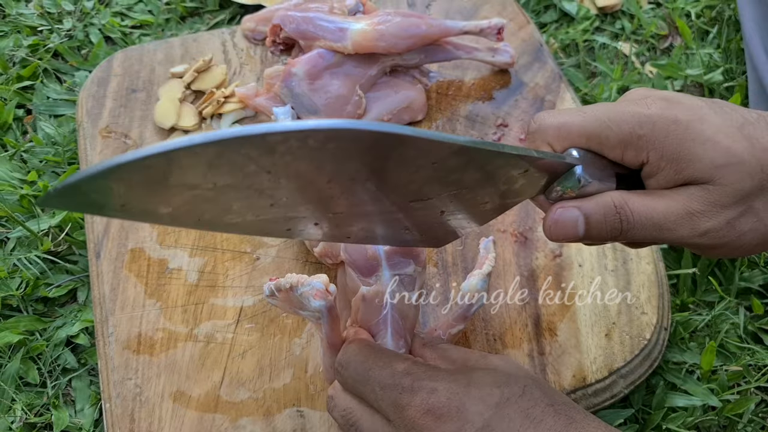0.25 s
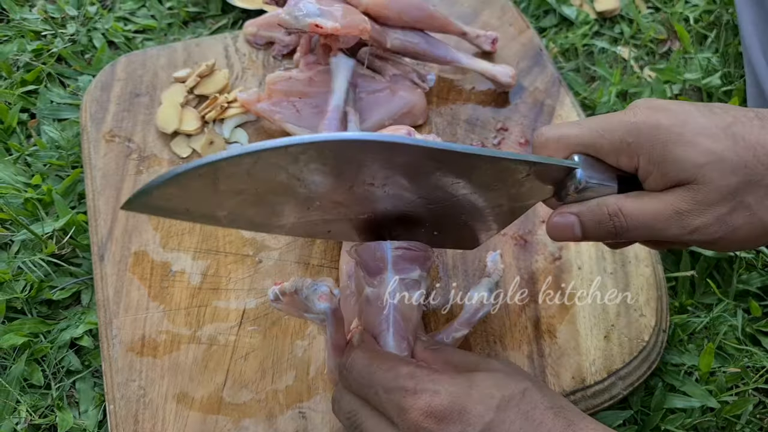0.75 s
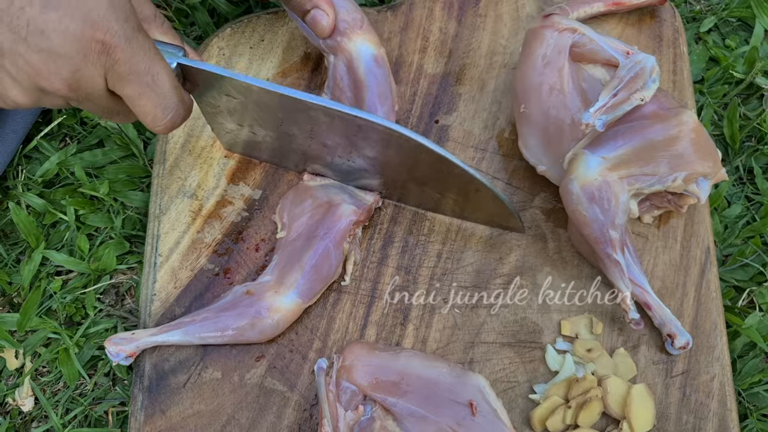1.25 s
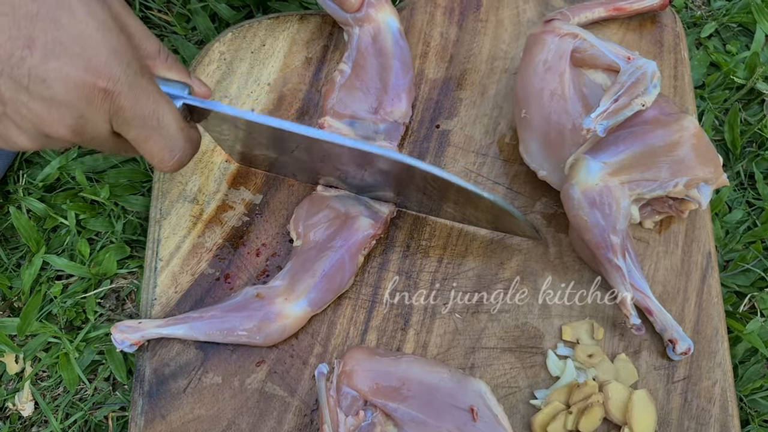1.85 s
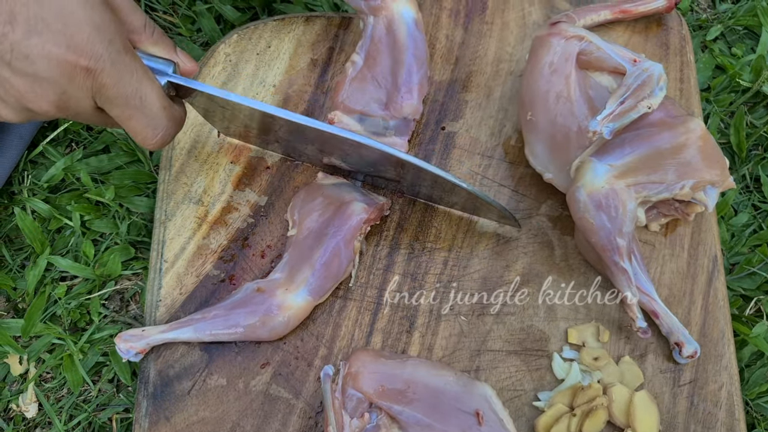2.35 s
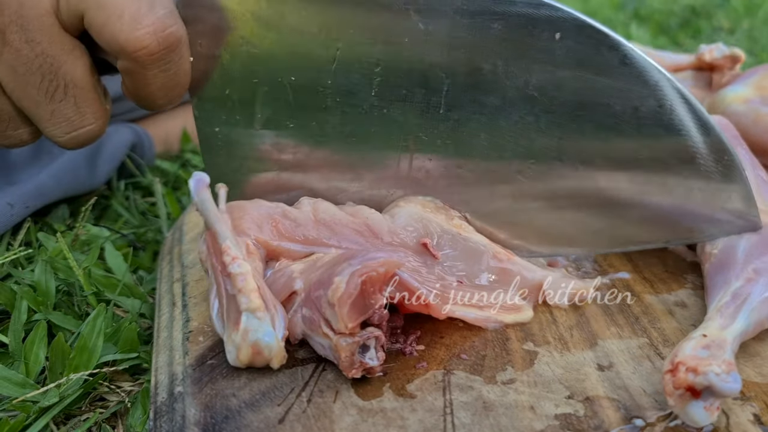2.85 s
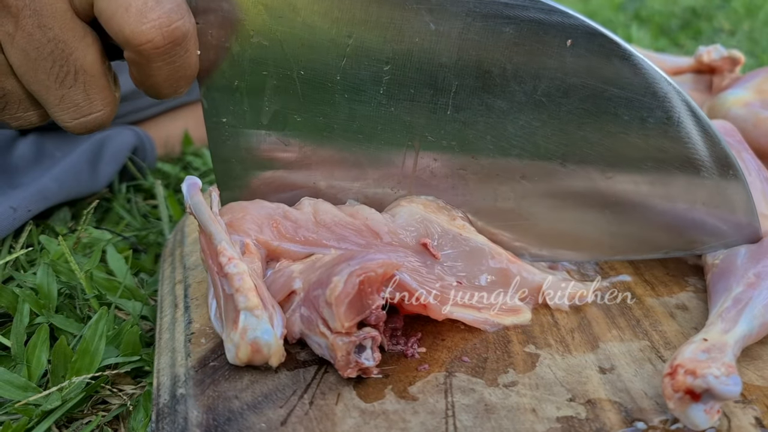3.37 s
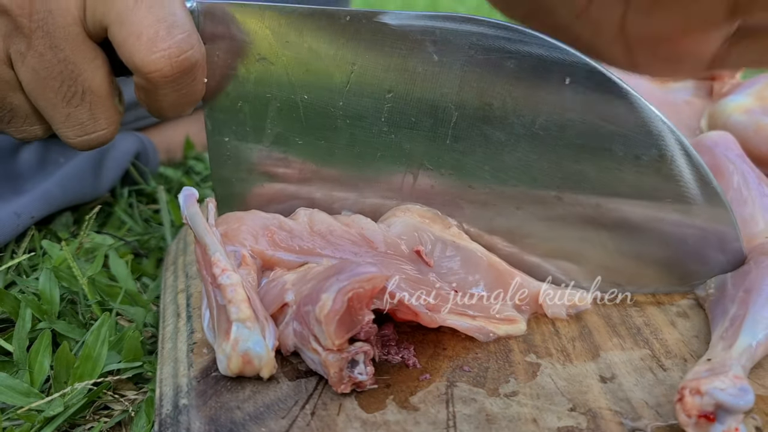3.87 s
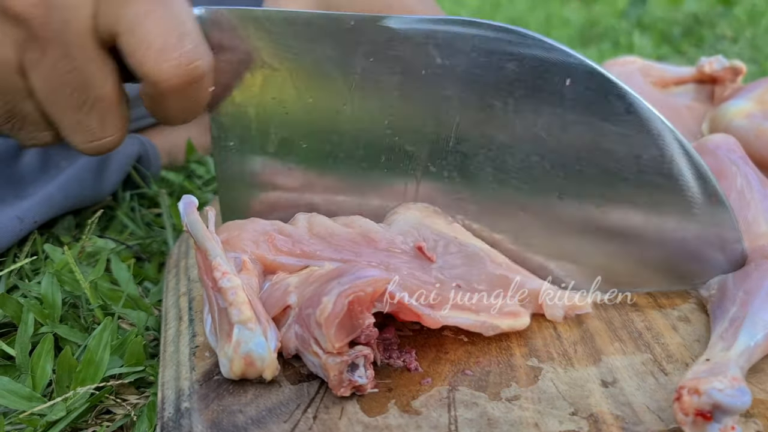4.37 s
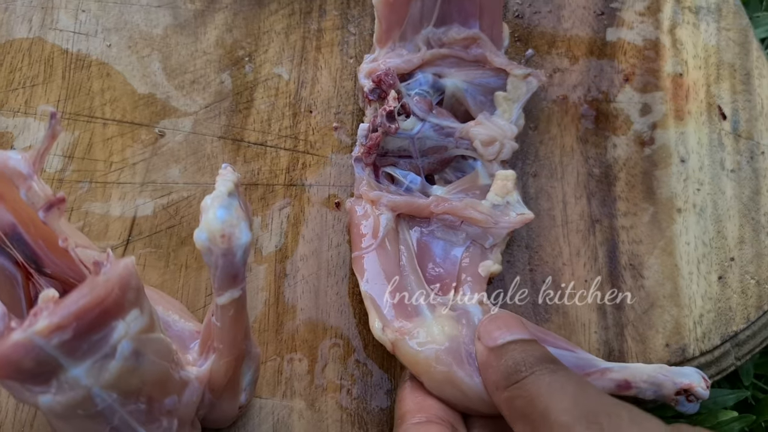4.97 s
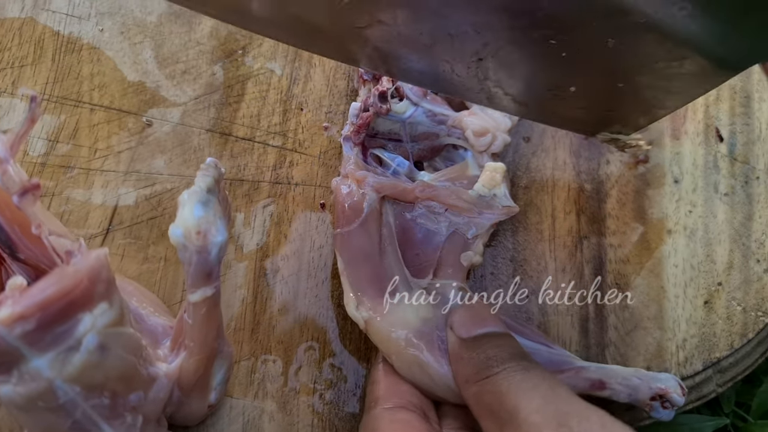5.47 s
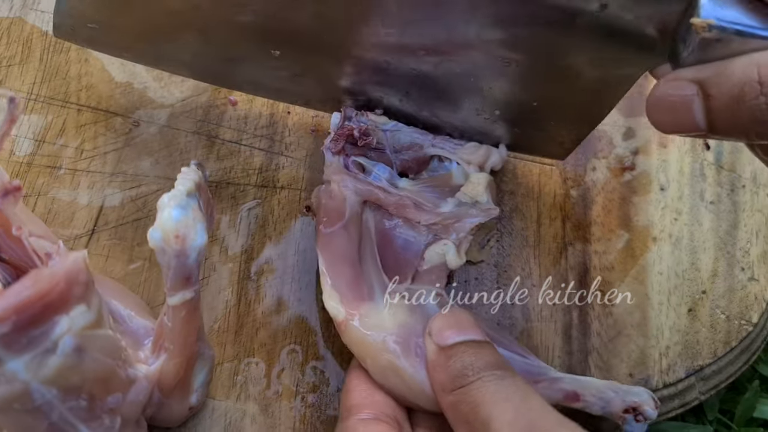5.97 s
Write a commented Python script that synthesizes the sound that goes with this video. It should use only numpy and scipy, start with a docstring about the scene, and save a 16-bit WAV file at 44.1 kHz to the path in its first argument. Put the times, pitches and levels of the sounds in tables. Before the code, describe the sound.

A heavy cleaver chops raw meat and bone on a thick wooden board outdoors, with hard woody thuds, gristly crunches and gusty low wind.

```python
"""On a thick wooden board lying on grass, a heavy cleaver chops raw chicken, heard close by.
Chops are fading sine tones (board, knock, thud) and filtered noise (flesh); crunches are bursts of clicks
that also ring the blade. Light taps, soft dull pats and bumps, and tearing gristle fill the gaps.
Wind is uneven low noise with single dull bumps. Behind it lie a faint hiss, a short steady hiss at the
start, a thin band of insects, and far birds made of gliding tones."""
import sys
import numpy as np
from scipy import signal
from scipy.fft import rfft, irfft, next_fast_len
from scipy.io import wavfile
from scipy.ndimage import uniform_filter1d, minimum_filter1d

SR = 44100
rng = np.random.default_rng(int(sys.argv[2]) if len(sys.argv) > 2 else 0)


def output_pcm(signal):
    """Save a mono or channel-first signal as 16-bit PCM at the path in sys.argv[1].

    Samples are clipped to [-1, 1] before scaling.
    """
    pcm = np.clip(np.atleast_2d(signal).T, -1, 1) * 32767
    wavfile.write(sys.argv[1], SR, np.round(pcm).astype(np.int16))


N = 273993
TIME = np.arange(N) / SR
CUTOFF_HZ = 15800  # coloured noise stops here

# Chops, one of them a light slice: t/s, thud level/dB, thud f/Hz, thud sag/share of pitch, board ring level/dB,
# board pitch/ratio, ring length/ratio, off-centre boost of the low modes/dB, knock f/Hz, knock level/dB,
# contact sharpness f/Hz, flesh level/dB, flesh f/Hz, cut time from skin to board/s, bite level/dB,
# ground thump level/dB, bone crack level/dB, wet squelch level/dB, splinter delay/s,
# splinter level/dB relative to crack and squelch
CHOPS = [(0.824, -20.5, 290, 0.02, -35.5, 1.22, 0.61, 11, 913, -16.5, 3000, -36.5, 930, .005, -25, -15.5, -34.5, -49, .012, 2),
         (2.354, -9, 440.4, 0.07, -12, 1.057, 0.65, 3, 765, -2.5, 1315, -8.5, 645, 0.0053, -16.5, -48.5, -24.5, -46.5, .004, -4.5),
         (2.834, -5.5, 230, 0.018, -7.5, 1.008, 1.06, 0.5, 1170, -3, 1610, -18.5, 887, .011, -18.5, -8.5, -21.5, -15, .0175, -12.5),
         (3.7311, -10, 440, 0.094, -10, 1.02, 0.51, -11, 1132, -6.5, 3000, -8, 736, 0.0041, -31, -6.5, -21.5, -20, 0.014, -9.5),
         (4.6242, -35.5, 463, 0.067, -37.5, 1.2, 0.64, -4, 1120, -18, 4000, -42, 1480, .004, -41, -61, -27.5, -29.5, 0.0095, -4.5),
         (5.9684, 6.5, 425, 0.03, -9.5, .985, 0.79, 5, 797, -10.5, 800, -10, 552, 0.0065, -17, -12.5, -34, -46.5, 0.0024, -12.5)]
# Ringing of the board with the blade in it, before each chop scales it: f/Hz, level/dB, t60/s
BOARD_MODES = [(262, -14.5, 0.1), (325, -7, 0.135), (376.2, 4.5, 0.16), (610, -12.5, 0.056),
               (686, -9, 0.096), (766, -9, 0.11), (1040, -20.5, 0.15), (1325, -15, 0.045),
               (1900, -25, 0.032)]
# Stages of each cut: lead on meeting the board/share of the cut time,
# crack level/dB and squelch level/dB relative to the chop's own, decay/s
CUT_STAGES = [(0.92, -10, -14.5, 0.0022), (0.48, -2.5, 0.5, 0.0035), (-0.27, 0, -15.5, 0.0028)]
# Ringing of the steel blade, damped by the meat, relative levels: f/Hz, level/dB
BLADE_MODES = [(1120, 0.5), (1340, -2), (1965, 3.5), (2900, -4.5), (3310, -4), (3720, -3.5), (4516, -9),
               (6753, -6), (7350, 1.5), (8311, 3.5), (8950, 2.5), (10411, 1.5)]
# The blade is set down lightly or rocks on the board: t/s, thud level/dB
LIGHT_TAPS = [(0.887, -43), (1.484, -40), (1.504, -34), (1.524, -38), (1.614, -40.5), (2.302, -35.5),
              (2.403, -27), (2.572, -39), (6.038, -33.5)]
# Gristle snaps under the pressed blade: t/s, bone crack level/dB, wet squelch level/dB
GRISTLE_SNAPS = [(0.831, -31.5, -49), (0.845, -42.5, -54), (1.5365, -38, -63.5), (2.343, -41.5, -64.5),
                 (2.9092, -45.5, -45.5), (2.9868, -53, -63.5), (4.2776, -42, -42.5), (4.4188, -64, -44),
                 (4.629, -33.5, -34), (4.643, -32, -50.5), (4.7022, -44.5, -37), (4.8775, -30.5, -27.5),
                 (4.9621, -41.5, -40), (5.0268, -45, -40)]
# Small fibres tear as the blade is worked through: start t/s, end t/s, mid crack level/dB, mid squelch level/dB
FIBRE_TEARS = [(2.595, 2.814, -64, -62.5), (4.218, 4.478, -64, -63.5), (4.633, 5.059, -61.5, -57.5),
               (4.997, 5.041, -56, -58.5)]
# Soft dull pats and bumps: t/s, level/dB, f/Hz
SOFT_PATS = [(1.345, -44, 380), (1.387, -39.5, 323), (2.908, -35, 320), (2.985, -45.5, 450),
             (5.21, -32, 448), (5.619, -49, 950)]
# Colour of cracking bone: f/Hz, relative level/dB per Hz
BONE_COLOUR = [(300, -13.5), (700, -11.5), (1200, 8.5), (1600, -7.5), (2000, 4), (2900, -0.5), (4000, -12),
               (6000, -28.5), (12000, -49.5)]
# Colour of squelching meat: f/Hz, relative level/dB per Hz
MEAT_COLOUR = [(1500, -27.5), (3000, -3), (4500, 0), (7300, -4.5), (9500, 0.5), (11500, 1.5), (13000, -3.5),
               (15500, -15)]
# Colour of the scatter from the surroundings: f/Hz, relative level/dB per Hz
SCATTER_COLOUR = [(100, -15), (350, 10.5), (800, -4.5), (3000, 8), (8000, -9.5)]
# Listening positions: start t/s, board left-right level/dB (positive is left), left wind level/dB,
# right wind level/dB, open hiss level/dB, right hiss level/dB, insect level/dB
POSITIONS = [(0.181, -31.5, -32.5, -27.5, -69, -91, -110), (1.341, 2.95, -61.5, -57.5, -51.5, -86.5, -105),
             (2.481, -36, -34, -50.5, -74.5, -52, -68), (4.971, -25.5, -26.5, -25.5, -70, -83.5, -105)]
# Strong gusts: t/s, width/s, boost over the wind/dB
STRONG_GUSTS = [(0.369, 0.036, 4), (1.209, 0.036, 9.5), (1.35, 0.037, 6.5), (3.945, 0.018, 15.5),
                (5.229, 0.031, 15.5)]
# Strong wind bumps on the microphone ports: t/s, level/dB, f/Hz, left-right level/dB, edge sharpness f/Hz
STRONG_BUMPS = [(1.193, -10, 93, -43, 800), (1.315, -13.5, 81.6, -22.5, 396), (1.441, -12.5, 106, -34, 700),
                (1.46, -12.5, 76, -25, 260), (3.094, -6.5, 98, 35, 350), (5.126, -12, 169, 21.5, 3000),
                (5.146, -15, 164.6, 17.5, 2500), (5.197, -5, 120, 17, 800), (5.22, -2, 90, -27, 420),
                (5.385, -10, 112, -18, 400)]
# Colour of the wind rumble: f/Hz, relative level/dB per Hz
RUMBLE_COLOUR = [(20, -7), (35, 3.5), (72, 5), (90, -4.5), (170, -30.5), (300, -40.5), (1200, -71),
                 (4000, -86.5)]
# Colour of the open outdoor hiss: f/Hz, relative level/dB per Hz
OPEN_HISS_COLOUR = [(30, 12), (70, 18), (150, 7), (250, 0), (380, 2.5), (600, -8), (2500, -13.5),
                    (3800, -18), (5000, -24), (7000, -42), (9000, -27.5), (15000, -30.5)]
# Colour of the hiss towards the right: f/Hz, relative level/dB per Hz
RIGHT_HISS_COLOUR = [(60, -2.5), (150, 8.5), (280, -3.5), (410, 8.5), (600, -11), (1100, -16), (1600, -23),
                     (2100, -18.5), (2500, -24), (6000, -26), (7000, -42.5), (8000, -29), (10500, -36),
                     (12500, -39.5)]
# Colour of the short steady hiss at the start: f/Hz, relative level/dB per Hz
OPENING_HISS_COLOUR = [(60, 22), (200, 9.5), (4000, -6), (15000, -15)]
# Far bird calls before flutter and scatter: t/s, length/s, mid pitch f/Hz, glide/Hz,
# arch/share by which the ends lie below the middle, level/dB
BIRD_CALLS = [(2.154, 0.15, 3140, -39, 0.009, -62.5), (2.529, 0.3, 1640, -22.5, 0.014, -58.5),
              (2.613, 0.16, 1330, -350, .01, -62), (3.848, 0.45, 1690, 135, .11, -65),
              (3.957, 0.26, 3060, 67.5, -0.049, -76.5), (4.062, 0.21, 1320, -460, -.02, -64.5),
              (4.46, 0.1, 2760, -200, .02, -65), (4.582, 0.25, 3100, 97.5, 0.019, -62),
              (5.023, 0.12, 2725, 199, 0.053, -66), (5.403, 0.069, 2880, -130, -.01, -75.5),
              (6.111, 0.063, 2830, -88, -.01, -79)]

CROSSFADE_S = 0.18  # hiss, insects and wind fade between positions
PUSH_S, THUD_SETTLE_S = 0.0008, 0.029  # the board takes up the blow; the thud sags as the edge beds in
FLESH_SPREAD = 1.5  # band edges of the flesh sound, as a ratio to its middle
# The edge meets bone and shoves it against the board, this share of the cut time early
BITE_LEAD_SHARE, BITE_RISE_S, BITE_DECAY_S = 0.41, 0.0012, 0.011
TAP_HZ, TAP_SAG, TAP_KNOCK_HZ, TAP_CONTACT_HZ, TAP_FLESH_HZ = 413.3, 0.12, 800, 940, 570
TAP_RING_DB, TAP_KNOCK_DB, TAP_FLESH_DB = -3.5, -11, -19  # relative to the thud
TAP_RING_SHARE = 0.79  # the resting blade shortens the board's ring
SPLINTER_DECAY_S, SNAP_DECAY_S, TEAR_DECAY_S = 0.0023, 0.0014, 0.003
THUMP_HZ, THUMP_T60_S, THUMP_EDGE_HZ = 129, 0.018, 240
BUFFET_DB, BUFFET_HZ, BUFFET_EDGE_HZ = 9.5, 93.4, 270  # weak wind bumps; level relative to the wind
OPENING_HISS_END_S, OPENING_HISS_FADE_S, OPENING_HISS_DB = 0.15, 0.012, -50
STILL_AIR_DB = -83.5  # hiss that is always there
TWITTER_START_S, TWITTER_END_S, TWITTER_PER_S = 3.2, 4.5, 9
TWITTER_HZ, TWITTER_GLIDE_HZ, TWITTER_DB, TWITTER_SPREAD = 2130, -240, -68, 0.03


def board_blows(thud_t60=0.042, knock_t60=0.023, flesh_t60=0.065):
    """The blade stops in the wood: a damped thud, a knock of steel, a smack of flesh and the board's ring."""
    out = np.zeros((2, N))
    t = np.arange(SR // 3) / SR
    push = 1 - np.exp(-t / PUSH_S)
    main_hz = max(BOARD_MODES, key=lambda mode: mode[1])[0]
    bedded_s = t - THUD_SETTLE_S * (1 - np.exp(-t / THUD_SETTLE_S))
    for (s, thud_db, thud_hz, sag, ring_db, tuning, length, off_centre_db,
         knock_hz, knock_db, contact_hz, flesh_db, flesh_hz) in chops_and_taps():
        modes = np.zeros(len(t))
        for hz, db, t60 in BOARD_MODES:
            # a blow off the centre changes the modes below the main one; each also varies by chance
            mode_db = db + off_centre_db * (hz < main_hz) + rng.standard_normal()
            modes += from_db(mode_db) * ring(t, tuning * hz, length * t60)
        flesh = soft_modes(flesh_hz, FLESH_SPREAD, len(t)) * np.exp(-np.log(1000) * t / flesh_t60)
        body = (from_db(ring_db) * modes + from_db(flesh_db) * flesh) * push
        thud = from_db(thud_db) * ring(t - sag * bedded_s, thud_hz, thud_t60)
        knock = from_db(knock_db) * ring(t, knock_hz, knock_t60)
        blow = low_pass(body + thud + knock, contact_hz, order=3)
        add(out, s, -board_sides(s) * blow)  # minus: the wave starts downwards
    return out


def chops_and_taps():
    """Chops and light taps strike the board alike: rows of CHOPS columns up to flesh f/Hz."""
    taps = [(s, db, TAP_HZ, TAP_SAG, db + TAP_RING_DB, 1, TAP_RING_SHARE, 0,
             TAP_KNOCK_HZ, db + TAP_KNOCK_DB, TAP_CONTACT_HZ, db + TAP_FLESH_DB, TAP_FLESH_HZ)
            for s, db in LIGHT_TAPS]
    return [row[:13] for row in CHOPS] + taps


def bites():
    """Just before the blade meets the board, it shoves bone against the wood: a swell of soft, damped modes."""
    out = np.zeros((2, N))
    t = np.arange(-SR // 30, SR // 20) / SR
    for row in CHOPS:
        s, (flesh_hz, cut_s, bite_db) = row[0], row[12:15]
        bite = soft_modes(flesh_hz, FLESH_SPREAD, len(t)) * swell(t, BITE_RISE_S, BITE_DECAY_S)
        add(out, s - BITE_LEAD_SHARE * cut_s + t[0], board_sides(s) * from_db(bite_db) * bite)
    return out


def crunches(rise_s=0.00078, grain_db=6.0, linger_db=-24, creep_s=0.005, linger_s=0.0052):
    """Fibres snap in a dense run of uneven clicks that flares as the edge bites and dies as it passes."""
    bone, meat = np.zeros((2, N)), np.zeros((2, N))
    t = np.arange(-SR // 50, SR // 12) / SR
    for s, crack_db, squelch_db, decay_s in breaks():
        # a few fibres give way before and after the main break
        run = swell(t, rise_s, decay_s) + from_db(linger_db) * swell(t, creep_s, linger_s)
        click_db = grain_db * np.minimum(rng.exponential(1, (2, len(t))), 4)
        clicks = rng.standard_normal((2, len(t))) * from_db(click_db)
        add(bone, s + t[0], board_sides(s) * from_db(crack_db) * run * rms_one(clicks[0]))
        add(meat, s + t[0], board_sides(s) * from_db(squelch_db) * run * rms_one(clicks[1]))
    crunch = coloured(bone, BONE_COLOUR) + coloured(meat, MEAT_COLOUR)
    return crunch + blade_ring(crunch)


def breaks(tears_per_stretch=30, spread_db=5.0):
    """Skin, meat, bone and gristle give way: rows of t/s, crack level/dB, squelch level/dB, decay/s."""
    rows = [(*snap, SNAP_DECAY_S) for snap in GRISTLE_SNAPS]
    for row in CHOPS:
        s, cut_s = row[0], row[13]
        crack_db, squelch_db, splinter_s, splinter_db = row[16:]
        for lead, stage_crack_db, stage_squelch_db, decay_s in CUT_STAGES:
            rows.append((s - lead * cut_s, crack_db + stage_crack_db, squelch_db + stage_squelch_db, decay_s))
        rows.append((s + splinter_s, crack_db + splinter_db, squelch_db + splinter_db, SPLINTER_DECAY_S))
    for start_s, end_s, crack_db, squelch_db in FIBRE_TEARS:
        for when, strength in rng.random((tears_per_stretch, 2)):
            s = start_s + when * (end_s - start_s)
            change_db = spread_db * (2 * strength - 1)
            rows.append((s, crack_db + change_db, squelch_db + change_db, TEAR_DECAY_S))
    return rows


def blade_ring(x, t60=0.022, ring_db=-6):
    """Whatever snaps at the edge makes the steel ring briefly."""
    t = np.arange(SR // 10) / SR
    modes = sum(from_db(db) * ring(t, hz, t60) for hz, db in BLADE_MODES)
    response = modes[None] / np.linalg.norm(modes)
    return from_db(ring_db) * signal.fftconvolve(x, response, axes=1)[:, :N]


def pats(rise_s=0.0011, decay_s=0.0067, spread=1.28):
    """Soft dull pats and bumps: a narrow band of noise that swells and dies quickly."""
    out = np.zeros((2, N))
    t = np.arange(-SR // 50, SR // 20) / SR
    for s, db, hz in SOFT_PATS:
        pat = soft_modes(hz, spread, len(t)) * swell(t, rise_s, decay_s)
        add(out, s + t[0], board_sides(s) * from_db(db) * pat)
    return out


def thumps():
    """From its first touch, a chop presses the whole board into the turf with a short, low thump."""
    out = np.zeros((2, N))
    t = np.arange(SR // 6) / SR
    thump = low_pass(ring(t, THUMP_HZ, THUMP_T60_S), THUMP_EDGE_HZ)
    for row in CHOPS:
        s, cut_s, thump_db = row[0], row[13], row[15]
        add(out, s - cut_s, -board_sides(s) * from_db(thump_db) * thump)
    return out


def surroundings(x, t60=0.12, wet_db=-26):
    """Ground and plants scatter sound back as a short tail of fading noise."""
    t = np.arange(SR // 2) / SR
    tail = coloured(rng.standard_normal((2, len(t))), SCATTER_COLOUR) * np.exp(-np.log(1000) * t / t60)
    tail /= np.sqrt(np.sum(tail ** 2, axis=1, keepdims=True))
    return from_db(wet_db) * signal.fftconvolve(x, tail, axes=1)[:, :N]


def wind(gust_db=4.0, bump_cycles=1.46, weak_bumps=16):
    """Each microphone port has its own eddies: a gusty rumble and single dull bumps."""
    eddies = noise(RUMBLE_COLOUR)
    # even out the rumble over a tenth of a second, so that flow and gusts set its strength
    eddies /= np.sqrt(uniform_filter1d(eddies ** 2, size=SR // 10, axis=1))
    flow = np.array([by_position(from_db(db)) for db in np.transpose(POSITIONS)[2:4]])
    gust = sum(db * np.exp(-((TIME - s) / width_s) ** 2) for s, width_s, db in STRONG_GUSTS)
    out = flow * from_db(gust + gust_db * drift(21)) * eddies
    t = np.arange(SR // 6) / SR
    for s, db, hz, side_db, edge_hz in STRONG_BUMPS:
        bump = low_pass(ring(t, hz, bump_cycles / hz), edge_hz, order=3)
        add(out, s, sides(side_db) * from_db(db) * bump)
    # weak bumps fall at random times, on left and right in turn, and follow the flow there
    buffet = from_db(BUFFET_DB) * low_pass(ring(t, BUFFET_HZ, bump_cycles / BUFFET_HZ), BUFFET_EDGE_HZ)
    for k, at in enumerate(rng.integers(0, N, weak_bumps)):
        port_gains = np.eye(2)[k % 2] * flow[:, at]
        add(out, at / SR, np.outer(port_gains, buffet))
    return out


def outdoors(right_pan_db=-22, insect_hz=8600, insect_width_hz=520):
    """Air and leaves hiss softly, a short steady hiss opens, and far insects fill a thin band of noise."""
    open_gain, right_gain, insect_gain = (by_position(from_db(db)) for db in np.transpose(POSITIONS)[4:])
    opening_fade = np.clip((OPENING_HISS_END_S - TIME) / OPENING_HISS_FADE_S, 0, 1)
    opening_hiss = from_db(OPENING_HISS_DB) * opening_fade * noise(OPENING_HISS_COLOUR)
    b, a = signal.iirpeak(insect_hz, insect_hz / insect_width_hz, fs=SR)
    insects = rms_one(signal.lfilter(b, a, rng.standard_normal(N)))
    right = right_gain * noise(RIGHT_HISS_COLOUR, channels=1) + insect_gain * insects
    open_hiss = (open_gain + from_db(STILL_AIR_DB)) * noise(OPEN_HISS_COLOUR)
    return open_hiss + opening_hiss + sides(right_pan_db) * right


def birds(waver=0.024, flutter_db=4.5, direct_db=-1):
    """Far calls are arched, wavering tones, fluttering on their way through trees beyond the board."""
    out = np.zeros((2, N))
    wobble = 1 + waver * drift(250)
    flutter = from_db(flutter_db * drift(54))
    for s, length_s, middle_hz, glide_hz, arch, db in BIRD_CALLS + twitter():
        during = (TIME >= s) & (TIME < s + length_s)
        u = (TIME[during] - s) / length_s  # 0 to 1 through the call
        arched_hz = middle_hz * (1 - arch * (2 * u - 1) ** 2)
        hz = (arched_hz + glide_hz * (u - 0.5)) * wobble[during]
        tone = np.sin(2 * np.pi * np.cumsum(hz) / SR)
        call = tone * np.sin(np.pi * u) * flutter[during]
        add(out, s, board_sides(s + length_s / 2) * from_db(db) * call)
    return from_db(direct_db) * out + surroundings(out, t60=0.46, wet_db=-6.5)


def twitter():
    """Another bird repeats a short falling note, uneven in pace and pitch: rows like BIRD_CALLS."""
    starts = np.arange(TWITTER_START_S, TWITTER_END_S, 1 / TWITTER_PER_S)
    rows = []
    for s, (late, high) in zip(starts, rng.random((len(starts), 2))):
        start_s = s + late / TWITTER_PER_S / 2
        middle_hz = TWITTER_HZ * (1 + TWITTER_SPREAD * (2 * high - 1))
        rows.append((start_s, 1 / TWITTER_PER_S, middle_hz, TWITTER_GLIDE_HZ, 0, TWITTER_DB))
    return rows


def board_sides(s):
    """Left and right gains for the board's direction at this time."""
    starts, side_db = np.transpose(POSITIONS)[:2]
    position = np.searchsorted(starts + CROSSFADE_S / 2, s) - 1
    return sides(side_db[max(0, position)])


def by_position(values):
    """One value per listening position, crossfaded in time; 0 before the first."""
    starts = np.array([row[0] for row in POSITIONS])
    faded_in = np.sin(np.pi / 2 * np.clip((TIME - starts[:, None]) / CROSSFADE_S, 0, 1)) ** 2
    return np.diff(values, prepend=0) @ faded_in


def spaced_ports(x, lead_s=0.00024):
    """The ports sit a little apart, so the left one hears the board slightly earlier."""
    return np.array([np.interp(TIME + lead_s, TIME, x[0]), x[1]])


def from_db(db):
    """Turns a level in dB into a gain."""
    return 10 ** (np.asarray(db) / 20)


def rms_one(x):
    """Scales a signal to an average strength (rms) of 1."""
    return x / np.sqrt(np.mean(x ** 2) + 1e-20)


def sides(pan_db):
    """Left and right gains; the nearer side stays at 1."""
    return from_db(np.minimum(0, np.array([pan_db, -pan_db]))).reshape(2, -1)


def coloured(x, spectrum):
    """Gives a signal a spectrum; white noise keeps its power."""
    hz, level_db = np.transpose(spectrum)
    size = next_fast_len(x.shape[-1])
    grid = np.maximum(np.fft.rfftfreq(size, 1 / SR), 1)
    gain = from_db(np.interp(np.log(grid), np.log(hz), level_db))
    gain *= np.minimum(1, grid / hz[0]) ** 2  # falls away below the first point
    gain *= grid < CUTOFF_HZ
    return irfft(rfft(x, size) * rms_one(gain), size)[..., :x.shape[-1]]


def noise(spectrum, channels=2):
    """Steady noise of rms near 1, unrelated from channel to channel."""
    return coloured(rng.standard_normal((channels, N)), spectrum)


def drift(rate):
    """Wanders by chance with a spread near 1, joining `rate` random points per second by straight lines."""
    knots = rng.standard_normal(8000)
    return np.interp(TIME * rate, np.arange(len(knots)), knots)


def ring(t, hz, t60):
    """A struck mode: a sine that starts at height 1 and fades by 60 dB in t60 seconds."""
    return np.sin(2 * np.pi * hz * t) * np.exp(-np.log(1000) * t / t60)


def swell(t, rise_s, decay_s):
    """An envelope that grows up to time 0 and dies after it."""
    return np.exp(np.minimum(t / rise_s, -t / decay_s))


def soft_modes(hz, spread, size):
    """Many damped modes, too close to tell apart, as in meat and bone: a band of noise of rms 1."""
    band = signal.butter(3, [hz / spread, hz * spread], "band", fs=SR, output="sos")
    return rms_one(signal.sosfilt(band, rng.standard_normal(size)))


def low_pass(x, hz, order=2):
    """Dulls a sound above hz."""
    return signal.sosfilt(signal.butter(order, hz, fs=SR, output="sos"), x)


def add(out, s, sound):
    """Mixes a stereo sound in at a time in seconds."""
    at = max(0, round(s * SR))
    out[:, at:at + sound.shape[1]] += sound[:, :N - at]


def scene(board_low_hz=215):
    """The cleaver close by, with wind and outdoor sounds around it."""
    # a board this small radiates little bass
    bass_cut = signal.butter(3, board_low_hz, "high", fs=SR, output="sos")
    cleaver = signal.sosfilt(bass_cut, board_blows() + bites()) + crunches()
    close_sounds = spaced_ports(cleaver + pats())
    return close_sounds + surroundings(close_sounds) + thumps() + wind() + outdoors() + birds()


def record(dry):
    """A fast limiter turns down the loudest peaks, then a steep filter cuts the top treble."""
    ceiling = 0.95
    room_left = ceiling / np.maximum(ceiling, np.abs(dry).max(axis=0))
    # hold the lowest gain over 5 ms, then smooth it
    gain = uniform_filter1d(minimum_filter1d(room_left, size=SR // 200), size=SR // 200)
    top_cut = signal.cheby2(16, 70, CUTOFF_HZ + 1000, fs=SR, output="sos")
    return signal.sosfilt(top_cut, dry * gain)


dry = scene()
out = record(dry)
output_pcm(out)
```